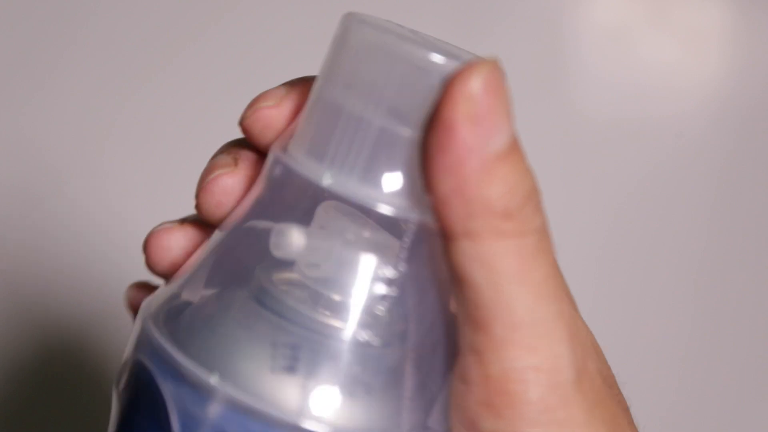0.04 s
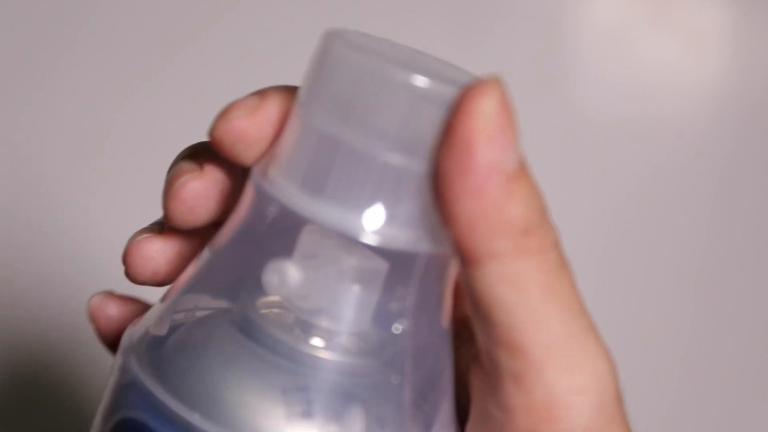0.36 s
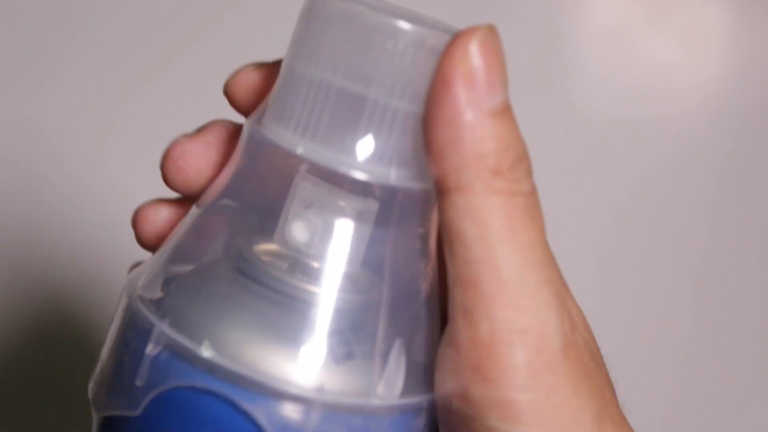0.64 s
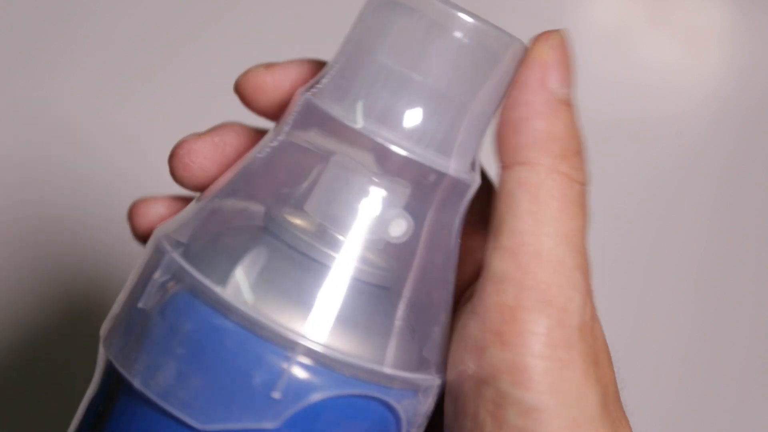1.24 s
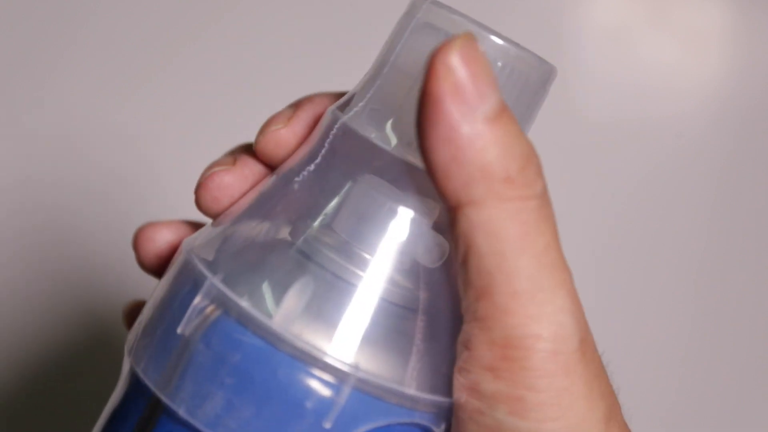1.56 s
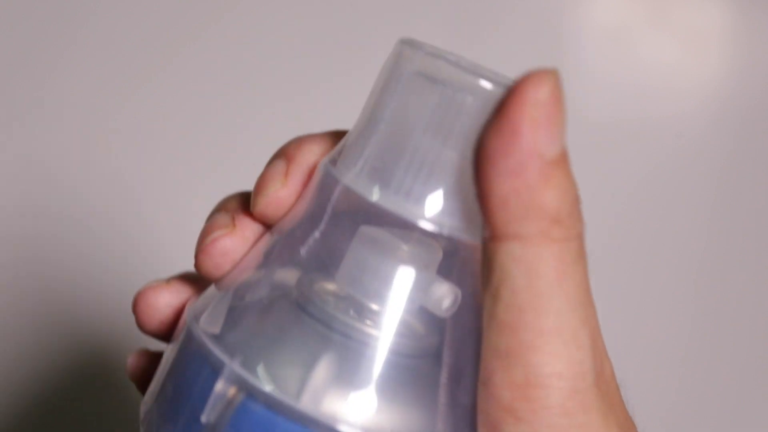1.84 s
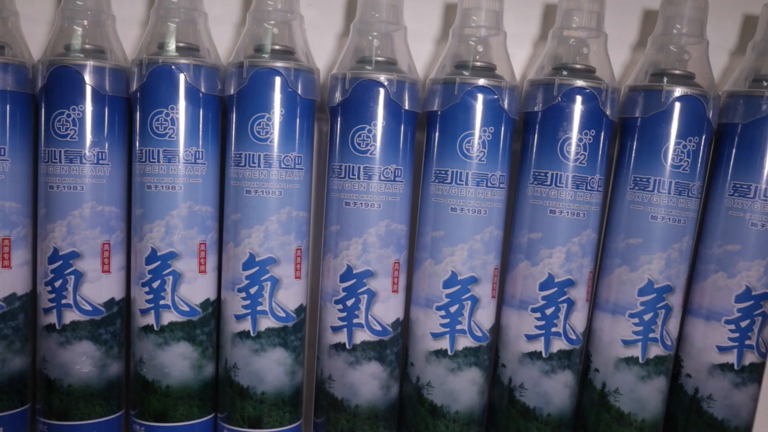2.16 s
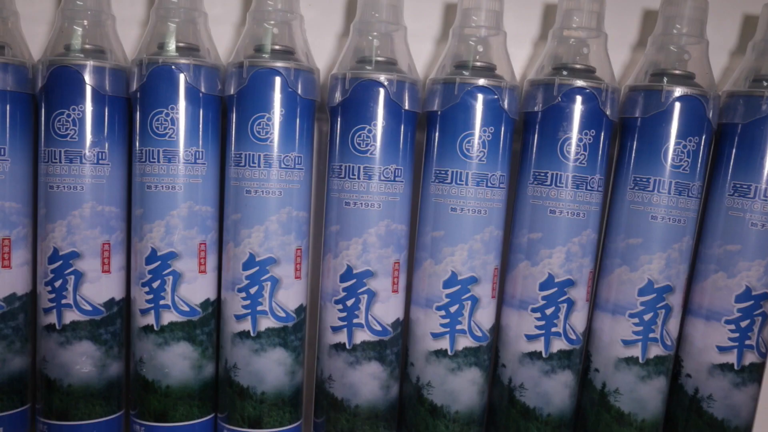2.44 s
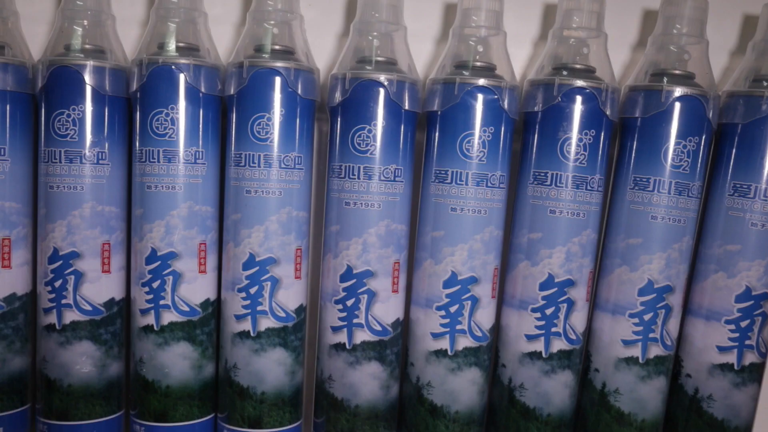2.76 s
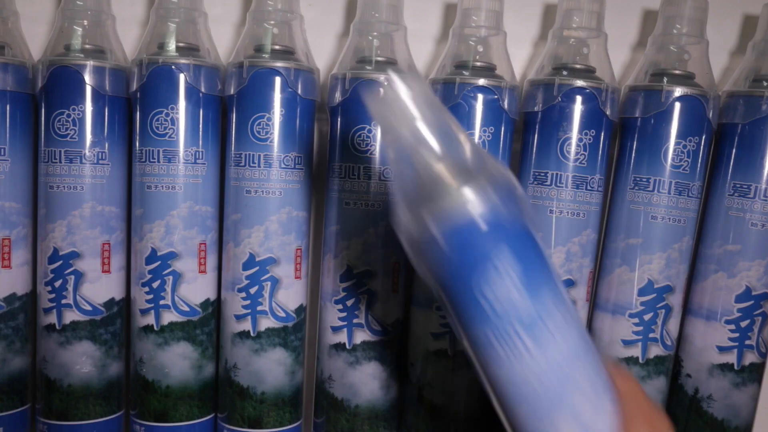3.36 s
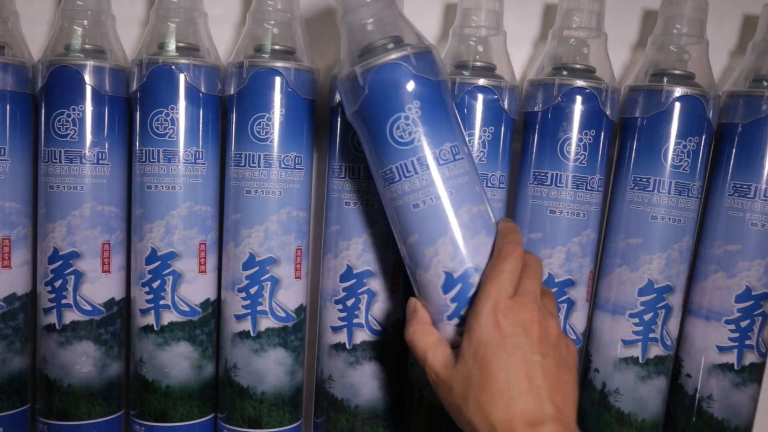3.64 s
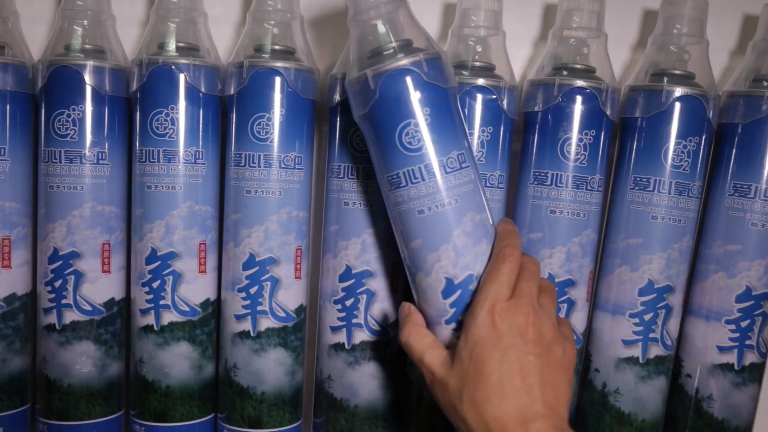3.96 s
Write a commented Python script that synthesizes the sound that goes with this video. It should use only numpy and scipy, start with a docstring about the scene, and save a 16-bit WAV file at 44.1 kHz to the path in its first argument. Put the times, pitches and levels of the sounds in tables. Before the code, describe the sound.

A metal can knocks twice against others and rings, after faint plastic ticks and finger rubbing.

```python
"""Faint plastic ticks and a soft rub of fingers in a very quiet room: a thin metal canister with a
plastic cap is being turned in the hand. The room hiss steps up, with a low hum, and the fingers slide
more firmly, their friction coloured by the hollow wall. Then the canister is laid in a row of others:
two clattering knocks, each a cluster of thuds and snaps, set the shelf booming and the cans ringing."""
import sys
import numpy as np
from scipy import signal
from scipy.fft import rfft, irfft
from scipy.io import wavfile

SR = 44100
rng = np.random.default_rng(int(sys.argv[2]) if len(sys.argv) > 2 else 0)


def store_pcm(level_fs):
    """Save levels as 16-bit WAV."""
    pcm = np.round(np.clip(level_fs, -1, 1) * 32767).astype(np.int16)
    wavfile.write(sys.argv[1], SR, np.atleast_2d(pcm).T)


N = 176400
TIME = np.arange(N) / SR


def from_db(db):
    """Decibels to gain."""
    return 10 ** (np.asarray(db) / 20)


def rms_one(x):
    """Scale to an rms of 1."""
    return x / np.sqrt(np.mean(x ** 2) + 1e-20)


def at_hz(points, hz, column=1):
    """Read a column of a table along log frequency."""
    table = np.array(points)
    return np.interp(np.log(hz), np.log(table[:, 0]), table[:, column])


def band(x, low_hz, high_hz):
    """Gentle band-pass."""
    edges = [low_hz, min(high_hz, SR / 2 - 100)]
    return signal.sosfilt(signal.butter(2, edges, "band", fs=SR, output="sos"), x)


def low_cut(x, hz, order):
    """Roll off the bass."""
    return signal.sosfilt(signal.butter(order, hz, "high", fs=SR, output="sos"), x)


def resonate(x, hz, width_hz):
    """A resonance with a gain of 1 at its top."""
    radius = np.exp(-np.pi * width_hz / SR)
    feedback = [1, -2 * radius * np.cos(2 * np.pi * hz / SR), radius ** 2]
    return signal.lfilter(np.array([1, 0, -1]) * (1 - radius ** 2) / 2, feedback, x)


def coloured_noise(colour):
    """Smooth steady noise of a given colour, rms 1."""
    hz = np.maximum(np.arange(N // 2 + 1) * SR / N, 1)
    spectrum = rfft(rng.standard_normal(N)) * from_db(at_hz(colour, hz))
    return rms_one(irfft(spectrum, N))


def decay(t60):
    """A fade that falls 60 dB in t60 seconds, followed down to 120 dB."""
    return 1000 ** (-TIME[:int(2 * t60 * SR) + 2] / t60)


def ring(hz, t60):
    """A struck mode that starts at height 1 and dies away."""
    fade = decay(t60)
    return fade * np.sin(2 * np.pi * hz * TIME[:len(fade)])


def snap(t60, edge_hz, body_hz=2660, fizz_db=-8.5):
    """The short crack of surfaces meeting; the harder the contact, the higher its upper edge."""
    white, fade = rng.standard_normal(SR // 4), decay(t60)
    crack = band(white, body_hz / 2, body_hz * 1.5) + from_db(fizz_db) * white
    return rms_one(band(crack, 260, edge_hz))[:len(fade)] * fade


def add(out, start_s, sound):
    """Mix a sound in at a time."""
    start = int(start_s * SR)
    part = sound[:max(N - start, 0)]
    out[start:start + len(part)] += part


# Colour of the hiss before and after it steps up. Each row: frequency in Hz, relative level in dB.
QUIET_HISS_COLOUR = [(30, 12.5), (70, 0), (130, -0.5), (250, 2), (600, -6.5), (1500, -7.5), (3500, -15),
                     (6000, -24.5), (11000, -23), (16000, -35)]
LOUD_HISS_COLOUR = [(30, 7.5), (60, -8.5), (120, -3), (250, -3), (550, -8), (1500, -9), (4200, -17.5),
                    (6000, -28), (11000, -28.5), (16000, -34)]


def room_tone(step_s=2.156, hum_hz=106.2, waver_width_hz=6.4):
    """A bed of faint hiss that steps up and gains a low hum, made to waver by a narrow band of noise."""
    waver = band(rng.standard_normal(N), hum_hz - waver_width_hz / 2, hum_hz + waver_width_hz / 2)
    hum = rms_one(np.sin(2 * np.pi * hum_hz * TIME)) + from_db(-1.5) * rms_one(waver)
    loud = from_db(-48) * coloured_noise(LOUD_HISS_COLOUR) + from_db(-59) * hum
    quiet = from_db(-68.5) * coloured_noise(QUIET_HISS_COLOUR)
    return np.where(TIME < step_s, quiet, loud)


# Fader curve of the thumb on the cap. Each row: time in seconds, level in dB.
THUMB_LEVELS = [(.38, -82), (.46, -69), (.95, -72.5), (1.2, -76), (1.42, -88)]
# The cap's broad, dull modes. Each row: pitch in Hz, width in Hz, gain in dB.
CAP_RESONANCES = [(1450, 110, -3), (1820, 200, 3), (2770, 250, -2.5)]
# Sliding skin, on cap and wall alike. Each row: frequency in Hz, relative level in dB.
SKIN_COLOUR = [(200, -29), (1000, -59), (2000, -7.5), (4400, -0.5), (5200, -3.5), (9800, 0.5), (13300, -1),
               (16000, -13.5)]


def cap_rub():
    """The thumb drags over the plastic cap, whose modes colour the friction."""
    times, levels_db = np.transpose(THUMB_LEVELS)
    friction = coloured_noise(SKIN_COLOUR)
    cap = sum(from_db(db) * resonate(friction, hz, width_hz) for hz, width_hz, db in CAP_RESONANCES)
    return np.interp(TIME, times, from_db(levels_db), left=0, right=0) * rms_one(cap)


# Small plastic ticks. Each row: start in seconds, level in dB, pitch in Hz,
# overtone in dB against the first mode, snap level in dB.
CAP_TICKS = [(.007, -52, 1510, 4.5, -51), (.389, -49.5, 1520, -24, -54), (0.5126, -53, 1460, -17, -52),
             (0.6982, -52, 1370, -22, -52.5), (0.741, -53.5, 1390, 1.5, -59),
             (1.137, -52, 1340, -17, -58.5), (1.463, -52, 1370, -10, -63), (1.779, -60, 2110, -4, -56),
             (3.2635, -39.5, 3740, -30, -39)]


def cap_ticks(overtone_ratio=2.02, t60=0.019):
    """The cap gives under the fingers: two short modes and a snap."""
    out = np.zeros(N)
    for start_s, db, hz, overtone_db, snap_db in CAP_TICKS:
        modes = ring(hz, t60) + from_db(overtone_db) * ring(hz * overtone_ratio, t60)
        add(out, start_s, from_db(db) * modes)
        add(out, start_s, from_db(snap_db) * snap(t60=0.02, edge_hz=13600))
    return out


# The palm's dull rustle. Each row: frequency in Hz, relative level in dB.
PALM_COLOUR = [(60, 3), (250, -0.5), (1000, -9), (2500, -3.5), (4500, -6), (6000, -23), (16000, -40)]


def grip_shift(peak_s=2.213, width_s=0.022):
    """One short, dull swell of the palm moving on the can."""
    swell = np.exp(-((TIME - peak_s) / width_s) ** 2 / 2)
    return from_db(-44.5) * swell * coloured_noise(PALM_COLOUR)


# Fader curves for the fingers: light turning near the cap, then firmer strokes along the body.
# Each row: time in seconds, level in dB.
TURNING_LEVELS = [(0, -67.5), (.19, -71.5), (.26, -68), (.35, -85), (.4, -82), (.48, -65), (.62, -77.5),
                  (.98, -76), (1.05, -85), (1.2, -80), (1.4, -92), (1.52, -85), (1.64, -70), (1.8, -71.5),
                  (1.96, -68), (2.02, -85), (2.06, -76), (2.15, -77)]
STROKE_LEVELS = [(2.156, -45.5), (2.21, -50.5), (2.255, -51), (2.33, -41.5), (2.38, -52), (2.47, -43.5),
                 (2.54, -48), (2.572, -52), (2.595, -43.5), (2.64, -53), (2.7, -52), (2.795, -48.5),
                 (2.875, -65), (2.97, -60), (3.05, -88), (3.1, -61), (3.16, -57), (3.21, -69), (3.7, -74)]
# The metal wall's resonances, widened by the hand's damping. Each row: pitch in Hz, width in Hz,
# gain in dB when gripped near the cap, gain in dB when gripped on the body.
WALL_RESONANCES = [(2535, 93, 15.5, 21), (3140, 40, 16, 14), (3363, 20, 8, 16.5), (4295, 90, 9, 8.5),
                   (4486, 85, 11, 9), (5920, 87, 10, 5), (7070, 170, 8.5, 0.5), (7980, 200, 5, -6),
                   (9050, 140, 5, -3), (9810, 87, 9, -3.5)]


def wall_rub(grain_db=1, grain_rates_hz=(14, 179)):
    """Skin sticks and slips: grainy friction, heard directly and through the can's hollow wall."""
    out = np.zeros(N)
    for grip, curve in enumerate((TURNING_LEVELS, STROKE_LEVELS)):
        times, levels_db = np.transpose(curve)
        grain = rms_one(band(rng.standard_normal(N), *grain_rates_hz))
        friction = coloured_noise(SKIN_COLOUR) * from_db(grain_db * grain)
        wall = sum(from_db(gains_db[grip]) * resonate(friction, hz, width_hz)
                   for hz, width_hz, *gains_db in WALL_RESONANCES)
        touching = (TIME >= times[0]) & (TIME < times[-1])
        out += touching * from_db(np.interp(TIME, times, levels_db)) * rms_one(friction + wall)
    return out


# The room's answer to a knock. Each row: frequency in Hz, gain in dB, 60 dB decay time in seconds.
REVERB_BANDS = [(60, -0.5, 0.2), (151, -4, 0.39), (330, -6, 0.31), (810, -7.5, 0.35), (1530, -6.5, 0.47),
                (3000, -8, 0.23), (6000, -6, 0.39), (15000, -2, 0.19)]


def room_reverb(x, onset_s=0.0016):
    """A diffuse tail that dies at its own rate in each half octave."""
    t, tail = TIME[:SR], 0
    onset = 1 - np.exp(-(t / onset_s) ** 2)
    edges_hz = 50 * 2 ** (np.arange(18) / 2)
    for low, high in zip(edges_hz, edges_hz[1:]):
        hz = np.sqrt(low * high)
        fade = from_db(-60 * t / at_hz(REVERB_BANDS, hz, column=2))
        wash = rms_one(band(rng.standard_normal(SR), low, high) * onset * fade)
        unity_gain = np.sqrt(2 * (high - low)) / SR   # brings the band to a gain of about 1
        tail = tail + from_db(at_hz(REVERB_BANDS, hz)) * unity_gain * wash
    return signal.fftconvolve(x, tail)[:N]


# The shelf's low boom and the cans' bright ring.
# Each row: pitch in Hz, relative level in dB, 60 dB decay time in seconds.
SHELF_MODES = [(102.8, -29, 0.2), (167, -40.5, 0.58), (246.2, -25, 0.21), (335, -32, 0.17),
               (390, -36.5, 0.41), (459, -32, 0.44), (558, -33, 0.45), (690, -40, 0.42), (782, -40, 0.34),
               (878, -28.5, 0.26), (1048, -32, 0.14), (1185, -33, 0.23)]
HELD_CAN_MODES = [(2495, -42, 1.3), (2617, -44, 1.0), (3348, -44, .45), (3515, -53, .6), (4457, -49, .45),
                  (7246, -62, .6), (2750, -44, .25), (3285, -47, .35), (4740, -59, .4), (5109, -59, .4),
                  (6126, -64, .5)]
NEIGHBOUR_CAN_MODES = [(1751, -25.5, .57), (2143, -28, .34), (3133, -40, .22), (1428, -36, .2),
                       (1637, -42, .2), (1850, -36, .15), (3005, -46, .25), (5459, -60, .4)]
# How hard the two knocks shake each body. Each row: start in seconds, then gain in dB
# for the shelf, the held can and the neighbouring can.
KNOCK_STRENGTHS = [(3.7099, -4, -5, -17), (3.8406, -2.5, 1.5, -1)]


def shelf_and_cans():
    """The shelf and the two cans ring on in their own modes after each knock."""
    out = np.zeros(N)
    bodies = (SHELF_MODES, HELD_CAN_MODES, NEIGHBOUR_CAN_MODES)
    for start_s, *strengths_db in KNOCK_STRENGTHS:
        for modes, strength_db in zip(bodies, strengths_db):
            for hz, db, t60 in modes:
                add(out, start_s, from_db(strength_db + db) * ring(hz, t60))
    return out


# Rim, wall and base touch down in two clusters. Each row: start in seconds, thud drive in dB, pitch
# in Hz, 60 dB decay time in seconds, snap level in dB, the snap's upper edge in Hz.
TOUCHDOWNS = [(3.7085, -14.5, 1490, 0.013, -19, 6070), (3.7101, -24.5, 2500, 0.093, -29.5, 11500),
              (3.7128, -6, 495, 0.0072, -22, 10700), (3.714, -8, 160, 0.018, -46, 5030),
              (3.7222, -22, 930, 0.021, -36, 4000), (3.7352, -25.5, 950, 0.025, -34, 7000),
              (3.7366, -24, 324, 0.036, -48, 3000), (3.7694, -21.5, 1550, 0.0066, -52, 4000),
              (3.8346, -11.5, 1260, 0.016, -23, 2760), (3.835, -2.5, 333, 0.031, -37, 2800),
              (3.8389, -0.5, 1110, 0.0028, -31, 12800), (3.8405, 3.5, 838, 0.0094, -15, 2850)]


def canister_clatter():
    """Each touch of the canister is a heavily damped thud with a snap on top."""
    out = np.zeros(N)
    for start_s, thud_db, hz, t60, snap_db, edge_hz in TOUCHDOWNS:
        thud = low_cut(ring(hz, t60), 0.65 * hz, order=1)   # a thud radiates little far below its pitch
        add(out, start_s, from_db(thud_db) * thud)
        add(out, start_s, from_db(snap_db) * snap(t60=0.0096, edge_hz=edge_hz))
    return out


def scene():
    """The mono mix: dry ticks and rubbing up close, clatter with reverb, ringing, and hiss behind."""
    handling = cap_ticks() + cap_rub() + wall_rub() + grip_shift()
    clatter = canister_clatter()
    return (handling + clatter + room_reverb(clatter) + shelf_and_cans() + room_tone())[None]


def record(dry, bass_cut_hz=70, ceiling=0.97, top_cut_hz=16100):
    """The microphone drops the deep bass, peaks are rounded, and the top is cut."""
    thin = low_cut(dry, bass_cut_hz, order=4)
    rounded = thin / (1 + (thin / ceiling) ** 6) ** (1 / 6)
    return signal.sosfilt(signal.ellip(10, .1, 80, top_cut_hz, fs=SR, output="sos"), rounded)


dry = scene()
out = record(dry)
store_pcm(out)
```